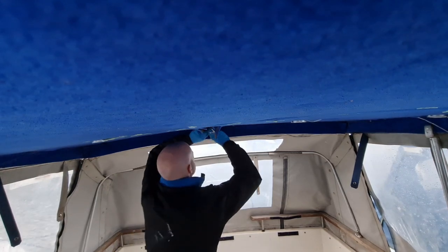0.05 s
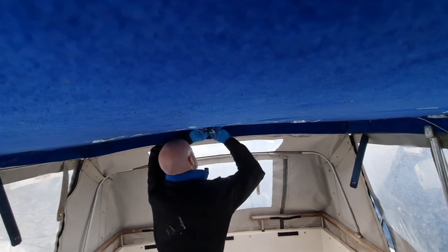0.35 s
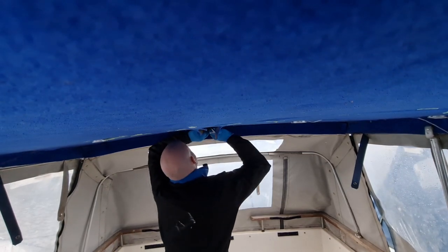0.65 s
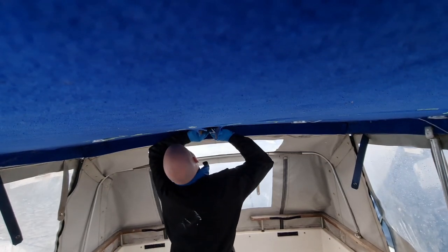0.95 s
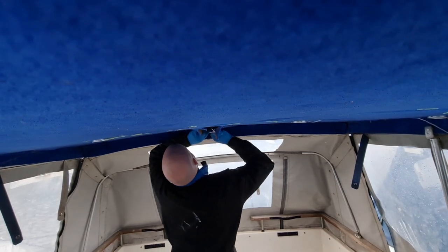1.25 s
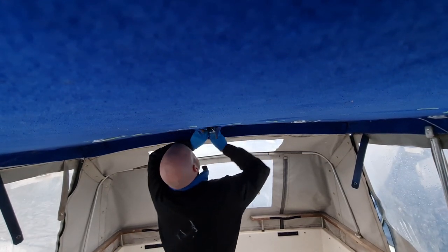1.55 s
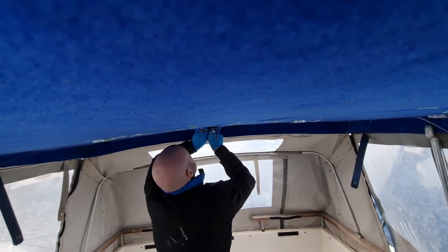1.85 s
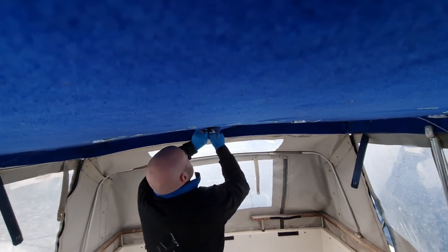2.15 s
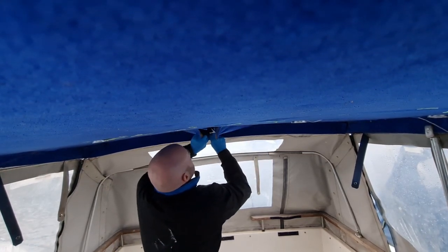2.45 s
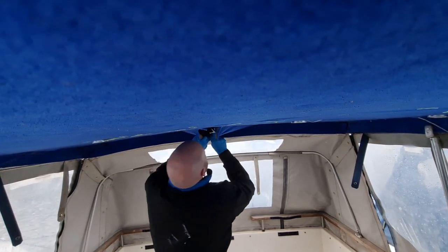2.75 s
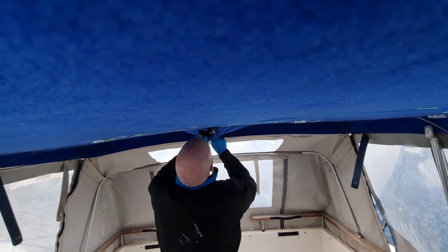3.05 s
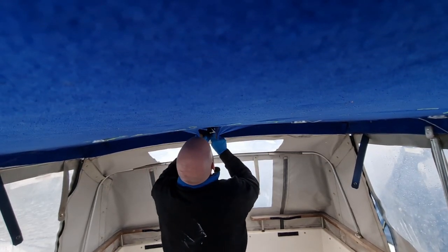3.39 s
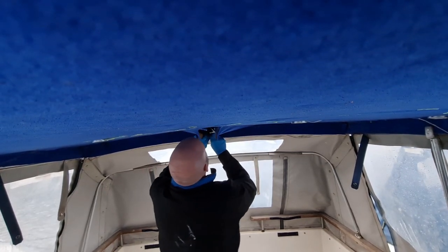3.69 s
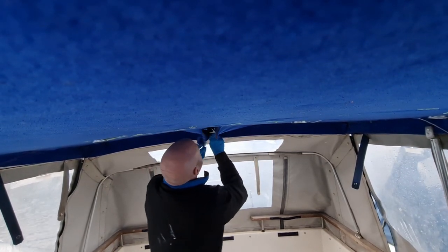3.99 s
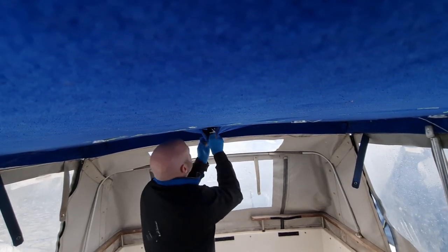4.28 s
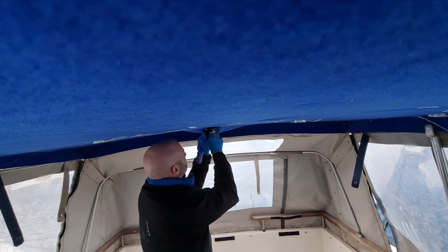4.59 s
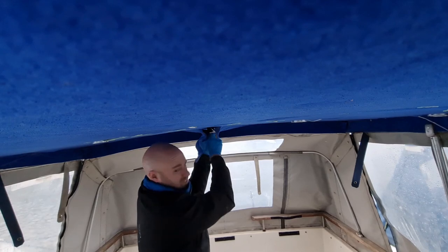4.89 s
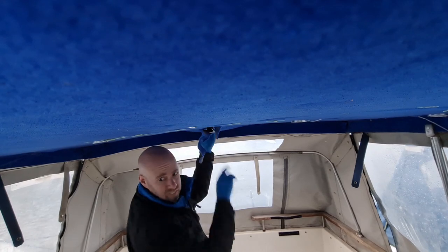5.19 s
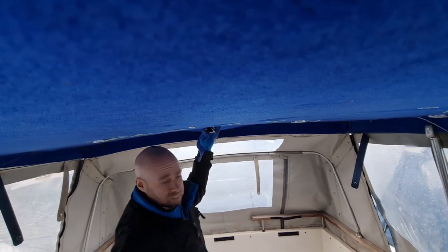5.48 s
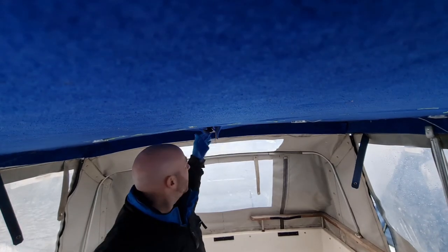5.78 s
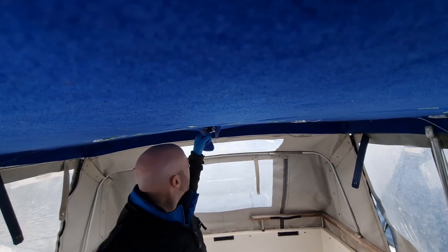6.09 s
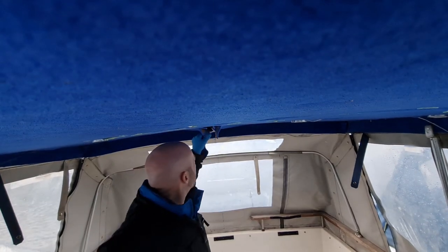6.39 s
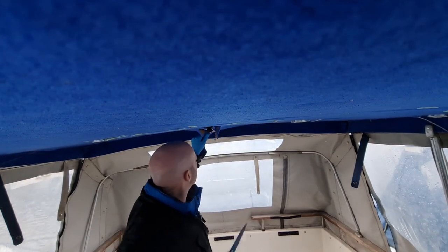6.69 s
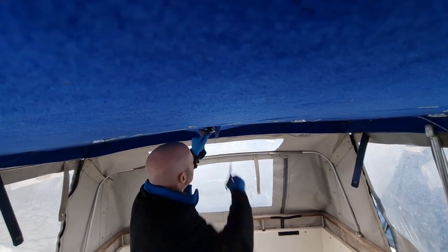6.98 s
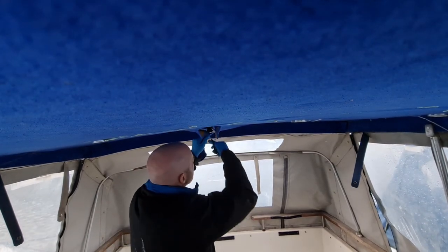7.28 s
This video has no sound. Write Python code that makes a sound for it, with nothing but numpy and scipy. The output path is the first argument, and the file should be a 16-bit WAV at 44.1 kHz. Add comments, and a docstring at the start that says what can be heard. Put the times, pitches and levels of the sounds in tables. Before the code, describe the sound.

Gloved hands work at a taut boat canopy, heard close up in stereo over gusty wind rumble. Irregular rustles and light creaks surround a few sharp fastener snaps and low booms of the canvas. The handling then quietens, leaving faint gliding bird whistles outdoors. Finally a tool clatters on a locker lid with more dull thumps and slides away with a short scrape.

```python
"""Wind rumbles on a moored boat's canvas canopy while gloves and sleeves rustle across it in tiny slips.
Each push booms the taut sheet like a slack drum; a fastener snaps and rings, and strained canvas creaks.
Outside, a small bird sings in gliding whistles. Near the end a tool knocks on a locker lid and
scrapes off it, and a faint low hum swells twice."""
import sys
import numpy as np
from scipy import signal
from scipy.fft import rfft, irfft, next_fast_len
from scipy.io import wavfile
from scipy.ndimage import uniform_filter1d

SR = 44100
rng = np.random.default_rng(int(sys.argv[2]) if len(sys.argv) > 2 else 0)


def bounce(signal):
    """Save signal as a 16-bit WAV file at the path given by the first command-line argument."""
    frames = np.transpose(np.atleast_2d(signal))
    limited = np.clip(frames, -1, 1)
    pcm = np.round(limited * 32767).astype(np.int16)
    wavfile.write(sys.argv[1], SR, pcm)


N = 323685
TIME = np.arange(N) / SR
RING_TIME = TIME[:SR // 2]  # half a second for each hit to ring out
CABIN_T60_S = 0.16

# Tone of the wind's rumble and of the outdoor hush. Each row: frequency in Hz, gain in dB.
RUMBLE_EQ = [(15, -39), (26, -17.5), (40, 0), (55, 0.5), (76, 0), (98, -11.5), (125, -17.5), (180, -18.5),
             (250, -28), (320, -22), (450, -32.5), (900, -75.5)]
HUSH_EQ = [(60, -8), (200, 0), (310, -2), (500, -8), (790, -11), (1300, -16), (2000, -22), (3200, -26),
           (5000, -28.5), (8400, -31.5), (9800, -39), (15500, -43)]
# Gusts on the canopy. Each row: time in seconds, level in dB.
GUSTS = [(0, -33.5), (.5, -37.5), (.9, -44), (1.45, -40), (2.1, -43), (2.8, -42.5), (3.1, -51), (3.6, -44),
         (4.2, -48), (4.8, -43), (5.1, -49), (5.55, -41), (5.8, -49), (6.5, -45.5), (7, -45.5), (7.34, -49)]
# Glove and sleeve strokes. Each row: peak time and length in seconds, rub and swish levels in dB.
STROKES = [(.055, 0.028, -54, -59.5), (.175, 0.078, -52, -70), (.3, 0.071, -49.5, -67),
           (.495, 0.028, -60, -72), (.695, 0.042, -56.5, -69), (.95, 0.26, -60, -72),
           (1.165, .04, -51, -62), (1.44, .03, -53, -74), (1.535, .03, -57, -71), (1.595, 0.059, -62, -70),
           (1.73, 0.064, -53.5, -63), (1.96, 0.045, -62, -76), (2.125, 0.034, -58, -72),
           (2.29, 0.073, -46, -61.5), (2.38, 0.084, -40.5, -50), (2.565, 0.096, -52, -60),
           (2.685, 0.1, -57, -63.5), (2.81, 0.11, -46.5, -61), (3.3, .09, -72, -76), (4.04, .1, -53.5, -57),
           (4.3, 0.22, -73, -71), (4.476, 0.027, -49.5, -71), (4.515, 0.069, -56, -61.5),
           (4.66, 0.16, -57, -67.5), (5.115, 0.089, -55, -58.5), (5.22, 0.08, -49.5, -69.5),
           (5.37, .09, -55, -74), (5.745, 0.15, -60.5, -69), (6.78, 0.092, -59.5, -77),
           (6.89, 0.029, -74, -71), (7.065, .04, -61, -68), (7.13, .07, -61.5, -78),
           (7.265, 0.12, -60.5, -69)]
# Light fidgeting of the hands between strokes. Each row: time in seconds, rub level in dB.
FIDGET = [(0, -61), (.8, -64.5), (2.1, -65.5), (2.75, -63), (3, -79.5), (3.8, -74), (4.9, -70),
          (5.4, -60.5), (6.6, -67), (7.34, -69)]
# Tone of rubbed canvas and of swishing sleeves. Each row: frequency in Hz, gain in dB.
RUB_EQ = [(200, -5.5), (400, -5), (590, 7), (820, 2), (1100, -5.5), (1350, 1.5), (1530, -2), (1800, -5.5),
          (2080, -5), (2400, -12.5), (2800, -10.5), (3500, -16.5), (5000, -49)]
SWISH_EQ = [(1500, -12), (3000, 3), (5000, 1), (7500, 3.5), (10000, -5.5), (15500, -3.5)]
# Pushes on the canopy. Each row: start in seconds, level in dB, rise in seconds, tilt in dB per octave.
# Each push has its own tilt, from a deep boom to a higher thump.
PUSHES = [(0.139, -15.5, 0.014, 1), (0.284, -23.5, 0.037, -0.5), (1.0287, -14.5, 0.0036, 9.5),
          (1.201, -14, 0.0026, 9), (1.259, -18.5, 0.0049, 8.5), (1.527, -30, 0.01, -19),
          (1.722, -32.5, 0.0073, -8), (1.949, -34, 0.017, 9), (2.262, -34, 0.0036, 9),
          (2.367, -10, 0.0025, 8), (2.425, -18.5, 0.0061, 5.5), (2.618, -31.5, 0.017, -27),
          (3.729, -37, 0.016, 6), (3.875, -34, 0.0087, -3), (4.45, -35, 0.023, -6),
          (4.649, -43, 0.0089, 11), (4.879, -36.5, 0.012, 10.5), (5.2, -33, 0.032, 9.5),
          (5.278, -23.5, 0.016, -16), (5.833, -18.5, 0.042, 5.5), (6.03, -23.5, 0.013, 0),
          (6.138, -31.5, 0.033, 3), (6.25, -29, 0.02, 5.5)]
# Modes of the canopy and the air under it. Each row: frequency in Hz, level in dB, T60 in seconds.
CANOPY_MODES = [(44.5, 0, 0.25), (57.5, 0, 0.19), (76.05, 7.5, 0.35), (87.3, 5, 0.15), (114.9, -5.5, 0.25),
                (160.8, -14.5, 0.24), (211.6, -16, 0.11)]
# Fastener snaps. Each row: start in seconds, level in dB, body and treble gains in dB.
SNAPS = [(0.177, -49.5, -16, 4.5), (0.282, -50.5, -13, -1), (0.309, -48, -1, 4), (1.018, -22.5, -5.5, -1),
         (1.022, -36, -8, 8.5), (1.191, -21.5, -5.5, 0), (1.196, -27.5, 1.5, 1.5), (1.274, -44.5, 6, -25),
         (1.717, -42.5, -2.5, -23), (2.251, -48, -15, -22), (2.313, -53.5, 10.5, 8),
         (2.332, -44.5, 2.5, -1), (2.345, -42, 8, -5), (2.356, -34.5, 11.5, -11), (2.382, -46, 5, 2),
         (2.397, -38.5, 4, -3.5)]
# Finger ticks. Each row: start in seconds, level in dB, treble gain in dB.
FINGER_TICKS = [(.472, -67, 3), (.686, -59.5, 4), (.842, -56.5, -18), (.894, -63, 1), (1.426, -54, -9),
                (1.52, -57.5, -2), (1.585, -57, -7), (2.11, -62.5, -7), (4.465, -51, -17),
                (4.5, -50.5, -22), (5.133, -58, -4), (5.174, -54.5, -3), (5.35, -58.5, -5),
                (5.489, -58.5, -6), (5.542, -52, -19), (6.803, -56.5, -23), (7.132, -58.5, -19),
                (7.204, -61.5, -13)]
# Tone of the fastener's crack. Each row: frequency in Hz, gain in dB.
SNAP_EQ = [(150, -15.5), (250, -6.5), (330, 2), (560, 1.5), (860, -9), (1150, -8), (1520, -3),
           (1980, -11.5), (2580, -10), (3150, -20.5), (4100, -23), (5200, -29), (6700, -33.5),
           (15500, -50.5)]
# Ring of the fastener and hoop. Each row: frequency in Hz, level in dB, T60 in seconds.
SNAP_MODES = [(315.2, -8.5, 0.3), (504, -1, 0.16), (548, 3, 0.1), (668, -31.5, 0.15), (1236, -4.5, 0.15),
              (1300, -5, 0.078), (1564, 7.5, 0.034), (2350, -32.5, 0.117), (2710, -9, 0.091),
              (3995, -1.5, 0.035)]
# Creaks of strained canvas. Each row: start and length in seconds, resonance in Hz, level in dB.
CREAKS = [(0.279, 0.024, 1080, -46.5), (0.838, 0.13, 1380, -58), (0.971, 0.064, 1520, -47.5),
          (1.159, 0.049, 1560, -39), (2.33, 0.084, 1430, -41.5), (2.345, 0.05, 1130, -45),
          (2.538, 0.046, 1580, -51), (4.608, .1, 1580, -55), (5.187, 0.032, 1480, -56),
          (5.679, 0.076, 1540, -55), (5.679, .1, 2500, -62), (6.43, .1, 1480, -51), (7.059, .1, 890, -59)]
# Bird notes. Each row: start and length in seconds, first, middle and last pitch in Hz, level in dB,
# trill depth as a fraction of the pitch.
BIRD_NOTES = [(1.759, 0.075, 3910, 3470, 3360, -68, 0.15), (1.811, 0.18, 3810, 3370, 3280, -69.5, 0.14),
              (1.952, 0.27, 3510, 3760, 3600, -73.5, 0.09), (2.407, 0.049, 8730, 8340, 8050, -64, 0),
              (2.523, 0.083, 8070, 8080, 7400, -61, 0.02), (2.744, 0.085, 8300, 8600, 8860, -71, 0.02),
              (2.908, 0.16, 7770, 8180, 8230, -77.5, 0.03), (3.19, 0.075, 3850, 4026, 4140, -56, 0.025),
              (3.253, 0.024, 4490, 5000, 5250, -67, 0.04), (3.286, 0.032, 4000, 4065, 4020, -54.5, .012),
              (3.32, 0.017, 4900, 5200, 5360, -69, 0), (3.388, 0.07, 3860, 4100, 4850, -57, .02),
              (3.5, 0.16, 4080, 4100, 3930, -76, 0.09), (3.827, 0.072, 7500, 7640, 7330, -67.5, 0.09),
              (3.947, 0.044, 8300, 7240, 6000, -67.5, 0.05), (4.154, 0.048, 7700, 5700, 4270, -61.5, 0.03),
              (4.261, 0.0494, 4720, 4010, 4000, -58, 0.02), (4.374, 0.072, 3540, 3500, 3280, -60.5, 0.04),
              (4.48, 0.054, 3520, 3590, 3710, -62, 0), (4.559, 0.087, 3810, 3960, 3900, -65, 0.07),
              (4.755, 0.044, 4180, 3680, 3600, -68, 0.05), (4.875, 0.047, 4260, 4200, 3660, -66, 0.02),
              (4.945, 0.087, 3900, 4130, 4600, -73.5, 0), (5.398, 0.32, 3980, 4150, 4250, -77, 0.08)]
# Tool knocks. Each row: start in seconds, level in dB, body and treble gains in dB.
KNOCKS = [(5.832, -42, 9, -9), (5.845, -38.5, 4, 4.5), (5.878, -24, -6, 2.5), (5.896, -36.5, 2, 3.5),
          (5.915, -37.5, 3.5, -2), (5.948, -35, 2.5, -25), (6.024, -29, -0.5, 5), (6.049, -33.5, 3, 6),
          (6.092, -47, 4.5, -27), (6.173, -60.5, 14.5, -8), (6.24, -39, 4.5, 3.5), (6.273, -47.5, 10, -22),
          (6.342, -52.5, 10.5, -22), (6.395, -55, 7, 14)]
# Ring of the tool and locker lid. Each row: frequency in Hz, level in dB, T60 in seconds.
KNOCK_MODES = [(168, -6.5, 0.274), (273.2, -4.5, 0.23), (383.1, 2.5, 0.28), (540.7, -1, 0.19),
               (691, -1, 0.19), (1182, -5, 0.14), (1446, -13, 0.15), (1860, -9, 0.13), (2105, -13.5, 0.12),
               (2380, -10, 0.1)]
# Tone of the tool's knock and of its scrape. Each row: frequency in Hz, gain in dB.
KNOCK_EQ = [(150, -16.5), (273, -9.5), (345, -15), (390, 3), (462, -6), (560, -2.5), (715, -5),
            (923, -10.5), (1380, -5.5), (1700, -18.5), (2350, -20), (3050, -27), (6350, -33), (15500, -58)]
SCRAPE_EQ = [(400, -16), (640, -5), (750, 4.5), (880, -16), (1280, -10), (1420, -9), (1480, 8), (1560, -16),
             (2100, -15), (3000, -26), (4000, -19.5), (6000, -45)]
# Tool slides. Each row: peak time and length in seconds, scrape and sleeve hiss levels in dB.
SLIDES = [(5.8, 0.061, -63, -62.5), (6.0, .06, -62, -63.5), (6.21, .08, -50.5, -58.5),
          (6.36, 0.15, -65, -65), (6.475, 0.1, -49, -59.5), (6.555, 0.098, -72, -58.5)]
# Swells of the low hum. Each row: peak time and length in seconds, level in dB.
HUM_SWELLS = [(6.62, 0.11, -55.5), (6.92, 0.18, -53.5)]
# Stereo width. Each row: frequency in Hz, gain of the side channel in dB.
WIDTH_EQ = [(60, -11.5), (110, -22.5), (200, -8), (380, -1.5), (700, 1.5), (1290, 4), (2380, 0), (4400, 0),
            (8120, 0.5), (15000, -0.5)]


def undb(db):
    """Decibels to gain."""
    return 10 ** (np.asarray(db) / 20)


def unit(x):
    """Scale to rms 1."""
    return x / np.sqrt(np.mean(x ** 2))


def punch(x, size=1764):
    """Give a hit the energy of `size` samples at rms 1, by default 40 ms."""
    return x / np.sqrt(np.mean(np.sum(x ** 2, axis=-1)) / size)


def fader(rows):
    """A fader ride: straight lines between (seconds, dB) points."""
    return np.interp(TIME, *np.transpose(rows))


def eq(x, points):
    """Causal EQ through (Hz, dB) points, built from the cepstrum."""
    n = 2 * next_fast_len(x.shape[-1] // 2 + 1024)
    hz, db = np.transpose(points)
    bin_hz = np.arange(n // 2 + 1) * SR / n
    gain = undb(np.interp(np.log(bin_hz + 1), np.log(hz), db))
    cepstrum = irfft(np.log(gain))
    cepstrum[1:n // 2] *= 2
    cepstrum[n // 2 + 1:] = 0
    return irfft(rfft(x, n) * np.exp(rfft(cepstrum)))[..., :x.shape[-1]]


def decay(t60):
    """An envelope that falls 60 dB in t60 seconds."""
    return np.exp(-np.log(1000) * RING_TIME / t60)


def wander(rate_hz):
    """Smooth random modulation with a spread near 1."""
    hold = max(int(SR / rate_hz), 2)
    steps = np.repeat(rng.standard_normal(N // hold + 1), hold)
    return uniform_filter1d(steps, hold)[:N]


def swells(rows, rise_share=0.51, edge_db=-9.5, roundness=1.25):
    """Round-topped swells, at edge_db at both ends of their length; one envelope per level column."""
    power = 0
    for peak, length, *db in rows:
        away = np.maximum((peak - TIME) / rise_share, (TIME - peak) / (1 - rise_share)) / length
        near = away < 6
        shape = np.zeros(N)
        shape[near] = undb(edge_db * away[near] ** roundness)
        power = power + np.outer(undb(db), shape) ** 2
    return np.sqrt(power)


def add(out, start, x):
    """Mix a sound in at `start` seconds."""
    i = max(int(start * SR), 0)
    out[..., i:i + x.shape[-1]] += x[..., :N - i]


def reverb(x, tail_db, t60=CABIN_T60_S):
    """Mono to mid and side: the direct sound, then dense reflections dying away."""
    response = undb(tail_db) * punch(rng.standard_normal((2, len(RING_TIME))) * decay(t60), size=1)
    response[:, 0] += 1
    return signal.fftconvolve(np.atleast_2d(x), punch(response, size=1), axes=1)[:, :N]


def wind():
    """Gusts rumble on the canopy over a soft outdoor hush."""
    rumble = unit(eq(rng.standard_normal((2, N)), RUMBLE_EQ))
    hush = unit(eq(rng.standard_normal((2, N)), HUSH_EQ))
    return rumble * undb(fader(GUSTS)) + hush * undb(-61.5 + 0.5 * wander(15))


def friction(slips_per_s, spread_db, spots=3):
    """Many small slips of uneven size at a few spots, each spot with its own echo in the cabin."""
    slips = rng.random((spots, N)) < slips_per_s / spots / SR
    polarity = rng.choice([-1, 1], (spots, N))
    strength = undb(spread_db * np.minimum(rng.exponential(size=(spots, N)), 3.5))
    return sum(reverb(spot, tail_db=6.5) for spot in slips * polarity * strength)


def cloth():
    """Canvas crinkles under the gloves and sleeves swish above it: strokes over light fidgeting."""
    rub_gain, swish_gain = swells(STROKES)
    fidget_rub = undb(fader(FIDGET) + 2.8 * wander(14))
    fidget_swish = fidget_rub * undb(-15.5)
    rub = unit(eq(friction(slips_per_s=850, spread_db=4), RUB_EQ)) * undb(1.95 * wander(38))
    swish = unit(eq(friction(slips_per_s=3200, spread_db=3), SWISH_EQ)) * undb(1.4 * wander(40))
    return rub * np.hypot(rub_gain, fidget_rub) + swish * np.hypot(swish_gain, fidget_swish)


def canopy():
    """Each push sets the taut sheet booming like a slack drum."""
    mid = np.zeros(N)
    for start, db, rise_s, tilt_db in PUSHES:
        boom = 0
        for hz, mode_db, t60 in CANOPY_MODES:
            gain = undb(mode_db + tilt_db * np.log2(hz / 75))
            boom += gain * decay(t60) * np.sin(2 * np.pi * hz * RING_TIME)
        attack = 1 - np.exp(-(RING_TIME / rise_s) ** 2)
        add(mid, start, undb(db) * punch(boom * attack))
    side = 1.1 * np.roll(mid, int(0.0025 * SR))
    return np.array([mid, side])


def impact(crack_eq, modes, body_db, treble_db, crack_t60, tail_db, tail_treble_db, ring_db):
    """A brief crack, its reflections under the canopy, and the ring of the struck object."""
    crack, tail = rng.standard_normal((2, 2, len(RING_TIME)))
    tail_eq = [(2500, tail_db), (6000, tail_db + tail_treble_db)]
    reflections = eq(punch(tail * decay(CABIN_T60_S)), tail_eq)
    contact = punch(crack * decay(crack_t60)) + reflections
    contact *= 1 - decay(0.0041)  # builds over about a millisecond
    ring = 0
    for hz, db, t60 in modes:
        detuned_hz = hz * (1 + 0.0074 * rng.standard_normal())
        cycles = detuned_hz * RING_TIME + rng.random((2, 1))
        ring += undb(db) * decay(t60) * np.sin(2 * np.pi * cycles)
    ring *= 1 - decay(0.0079)
    hit = punch(eq(contact, crack_eq)) + undb(ring_db) * punch(ring)
    return eq(punch(hit), [(500, body_db), (1000, 0), (2000, 0), (5000, treble_db)])


def fastener():
    """The fastener snaps and fingers tick on it. Hands shield it, so its treble is mostly reflected."""
    out = np.zeros((2, N))
    for start, db, body_db, treble_db in SNAPS:
        snap = impact(SNAP_EQ, SNAP_MODES, body_db, treble_db,
                      crack_t60=0.043, tail_db=-1.5, tail_treble_db=11, ring_db=-3.5)
        add(out, start, undb(db) * snap)
    for start, db, treble_db in FINGER_TICKS:
        tick = impact(SNAP_EQ, SNAP_MODES, body_db=1.5, treble_db=treble_db,
                      crack_t60=0.0076, tail_db=-2.5, tail_treble_db=6, ring_db=-7.5)
        add(out, start, undb(db) * tick)
    return out


def creaks(slips_per_s=700, bandwidth_hz=130):
    """Canvas under strain sticks and slips on the hoop, ringing one resonance per creak."""
    out = np.zeros((2, N))
    for start, length, hz, db in CREAKS:
        size = int(length * SR)
        slips = (rng.random(size) < slips_per_s / SR) * rng.standard_normal(size)
        slips *= np.hanning(size) ** 0.5
        ring = np.exp(-np.pi * bandwidth_hz * RING_TIME) * np.sin(2 * np.pi * hz * RING_TIME)
        add(out, start, undb(db) * punch(signal.fftconvolve(slips, ring), size=size))
    return reverb(out, tail_db=3)


def bird(trill_hz=70):
    """A small bird's gliding, partly trilled whistles, with the echoes of the moorings."""
    out, waver = np.zeros(N), wander(350)
    for start, length, first_hz, middle_hz, last_hz, db, trill_depth in BIRD_NOTES:
        t = TIME[:int(length * SR)]
        progress = t / length
        jitter = np.roll(waver, -int(start * SR))[:len(t)]
        warble = np.sin(2 * np.pi * trill_hz * t + 0.66 * jitter)
        glide = np.polyfit([0, 0.5, 1], [first_hz, middle_hz, last_hz], 2)
        hz = np.polyval(glide, progress) * (1 + trill_depth * warble + 0.01 * jitter)
        envelope = np.sin(np.pi * progress) ** 0.5 * undb(0.65 * warble)
        whistle = np.sin(2 * np.pi * np.cumsum(hz) / SR)
        add(out, start, undb(db) * unit(envelope * whistle))
    return reverb(out, tail_db=2, t60=0.24)


def tool():
    """A tool knocks about on a locker lid, then scrapes off it with a hiss of sleeve."""
    knocks = np.zeros((2, N))
    for start, db, body_db, treble_db in KNOCKS:
        knock = impact(KNOCK_EQ, KNOCK_MODES, body_db, treble_db,
                       crack_t60=0.029, tail_db=1.5, tail_treble_db=-6, ring_db=-1.5)
        add(knocks, start, undb(db) * knock)
    scrape_gain, hiss_gain = swells(SLIDES)
    scrape = unit(eq(friction(slips_per_s=1200, spread_db=3), SCRAPE_EQ))
    hiss_eq = [(2500, -9.5), (4500, -3), (6300, 6.5), (8400, -2), (11500, -9.5)]
    hiss = unit(eq(friction(slips_per_s=5500, spread_db=5), hiss_eq))
    return knocks + scrape_gain * scrape + hiss_gain * hiss


def hum():
    """A faint, wavering low hum swells and fades twice."""
    gain, = swells(HUM_SWELLS)
    hz = 294 * (1 + 0.0203 * wander(40))
    tone = np.sin(2 * np.pi * np.cumsum(hz) / SR)
    return gain * unit(reverb(tone, tail_db=2.5))


def scene():
    """Mix in mid and side; the close microphone pair is narrow in the bass, very wide in the mids."""
    mid, side = fastener() + tool() + canopy() + cloth() + creaks() + bird() + wind() + hum()
    side = eq(side, WIDTH_EQ)
    balance_db = 0.24  # the right microphone is a little louder
    return np.array([(mid + side) * undb(-balance_db / 2), (mid - side) * undb(balance_db / 2)])


def record(dry):
    """A steep low-pass trims the top end above 15.8 kHz."""
    return signal.sosfilt(signal.ellip(10, 0.2, 80, 15800, fs=SR, output="sos"), dry)


dry = scene()
out = record(dry)
bounce(out)
```